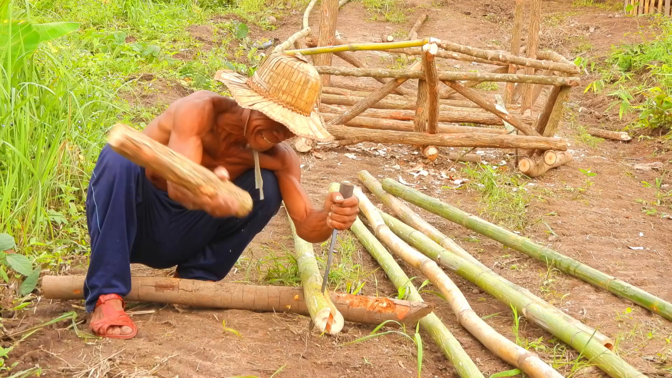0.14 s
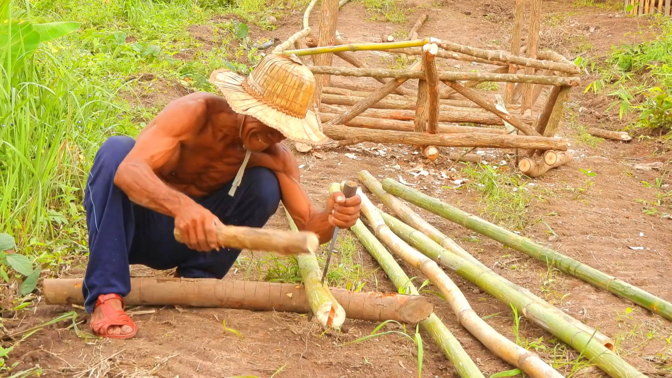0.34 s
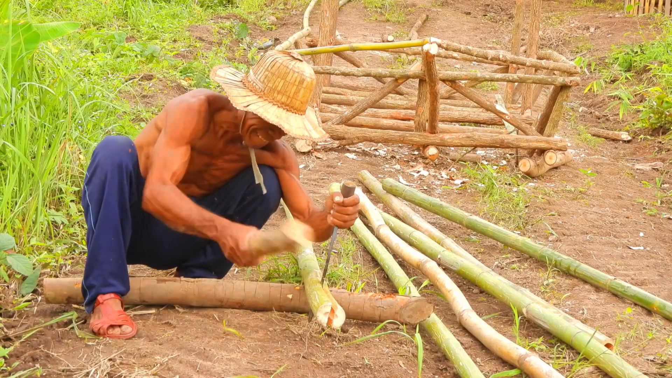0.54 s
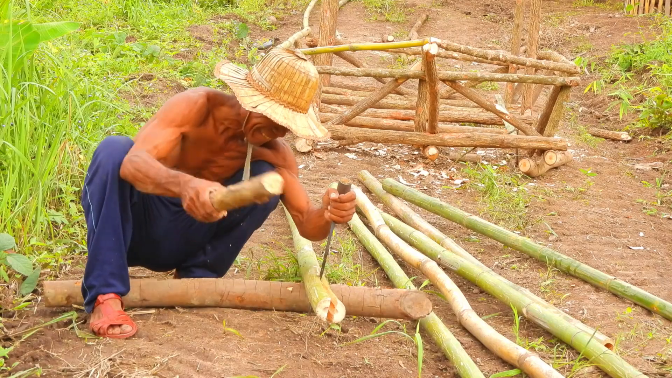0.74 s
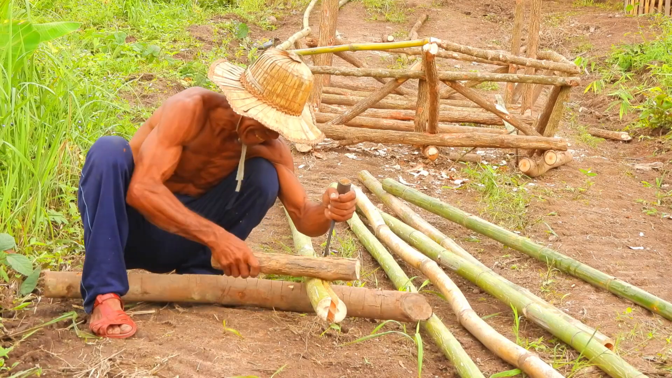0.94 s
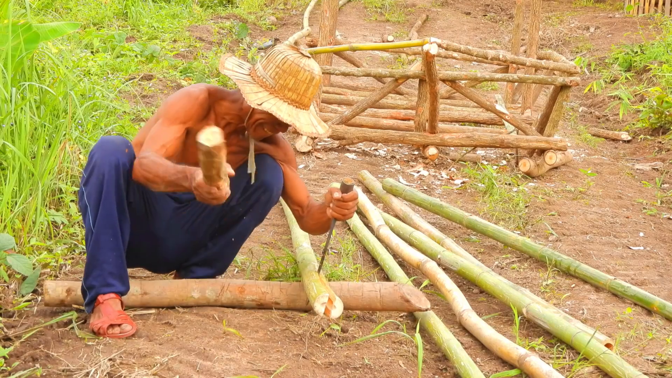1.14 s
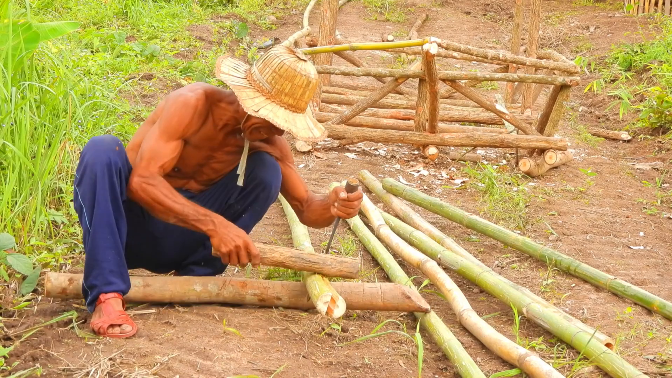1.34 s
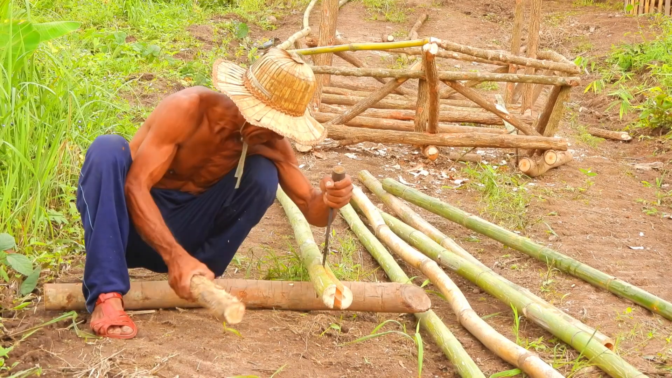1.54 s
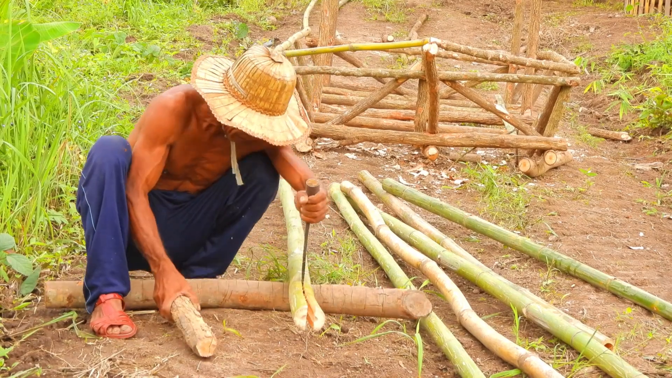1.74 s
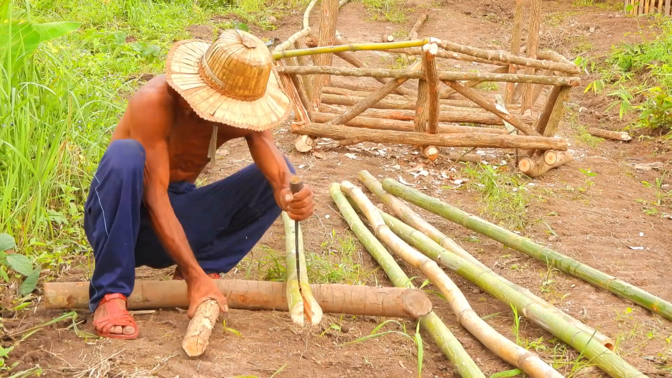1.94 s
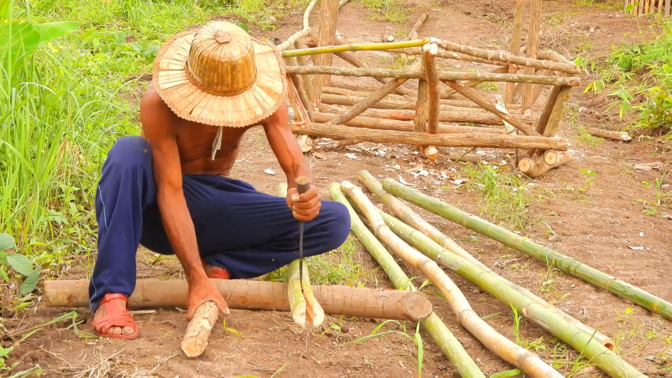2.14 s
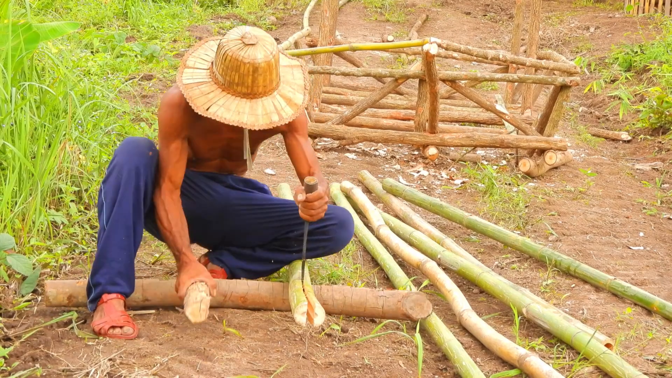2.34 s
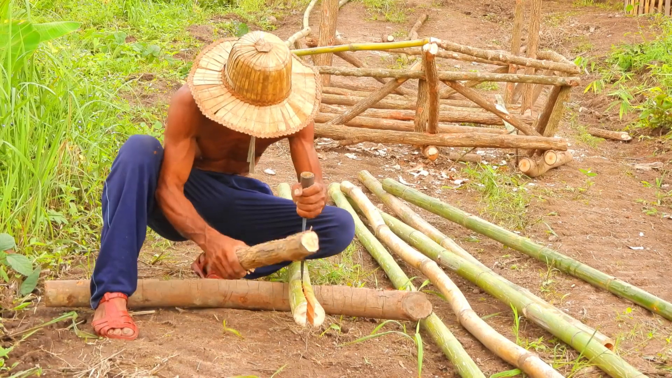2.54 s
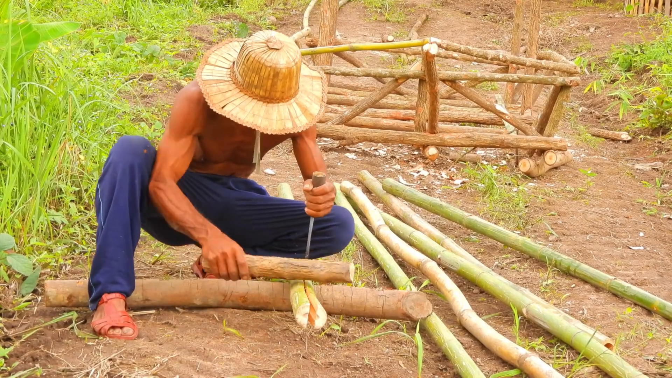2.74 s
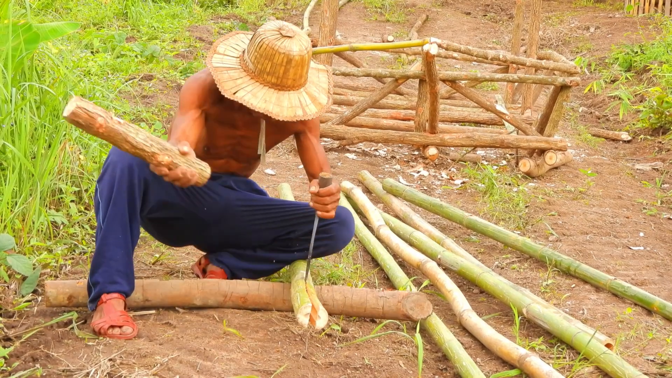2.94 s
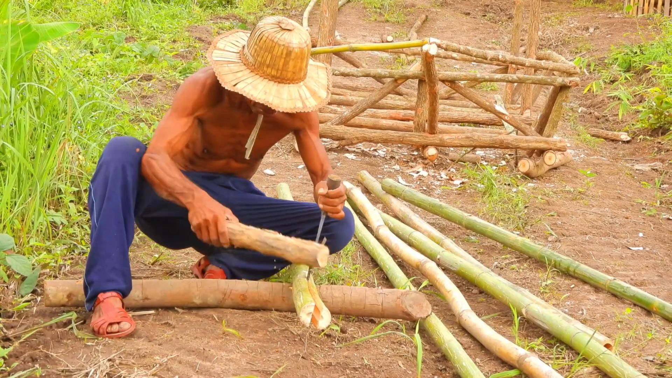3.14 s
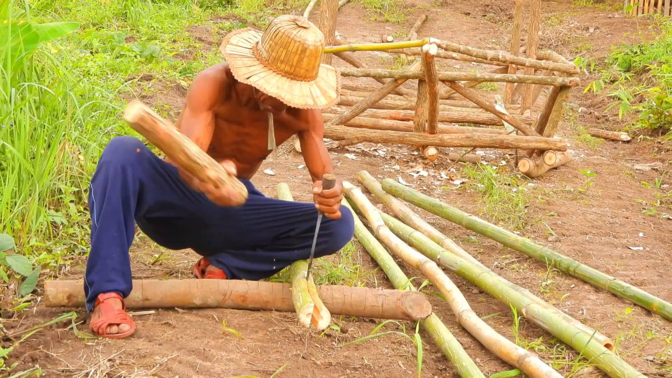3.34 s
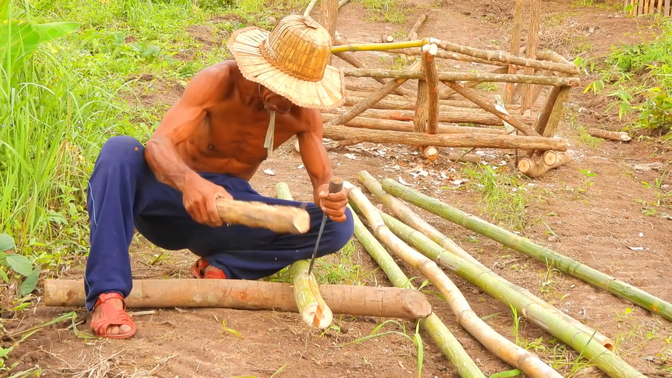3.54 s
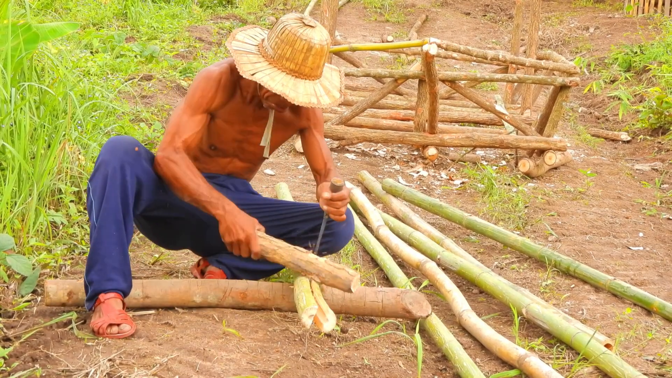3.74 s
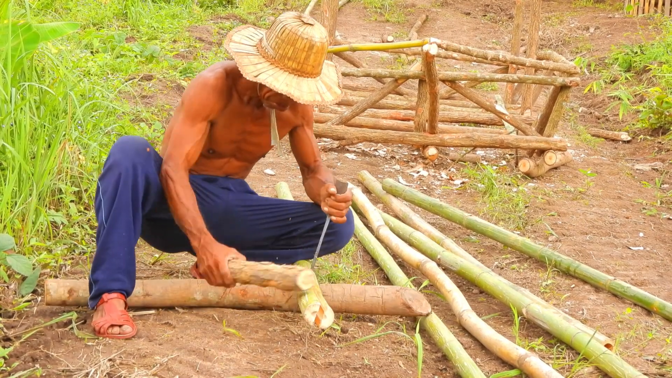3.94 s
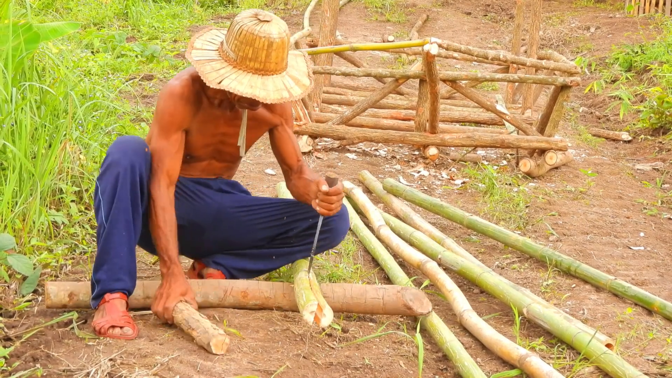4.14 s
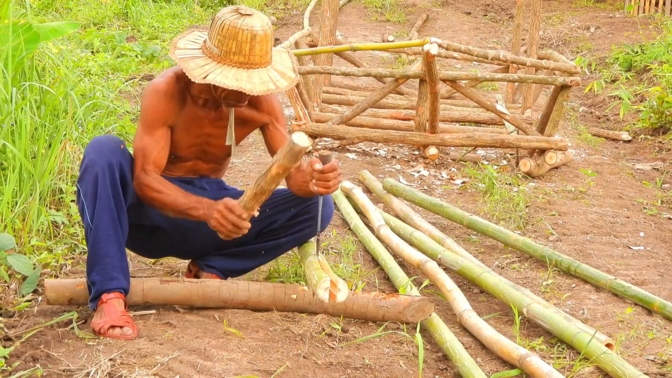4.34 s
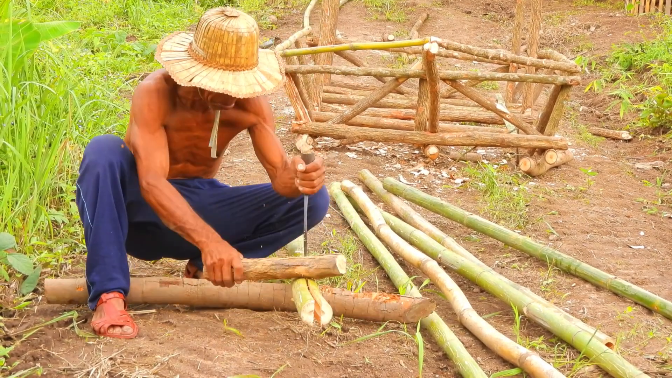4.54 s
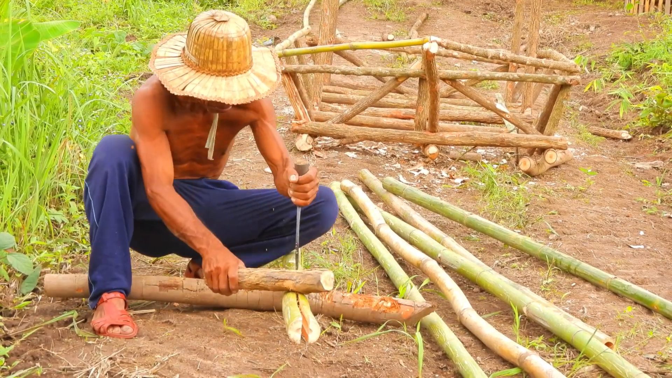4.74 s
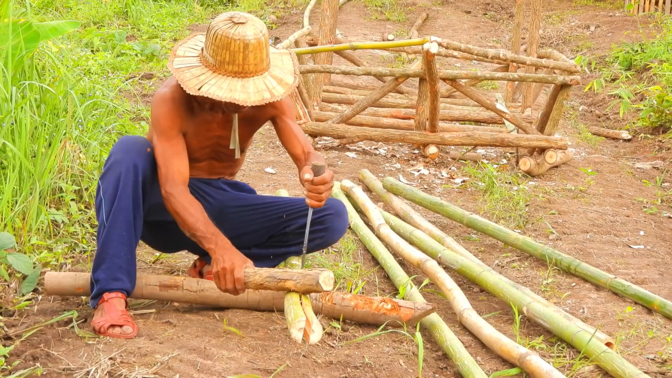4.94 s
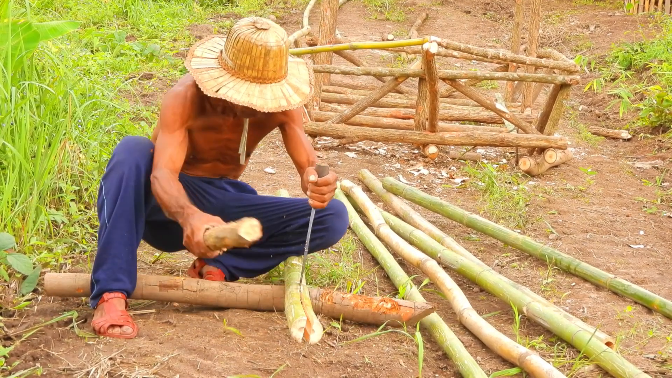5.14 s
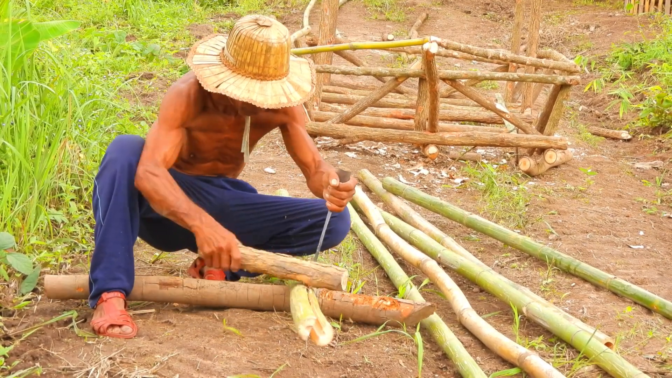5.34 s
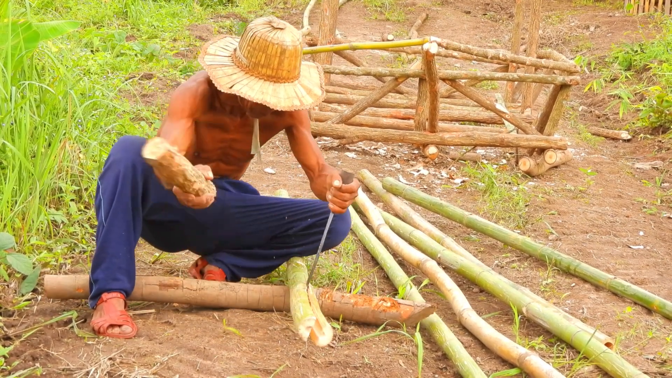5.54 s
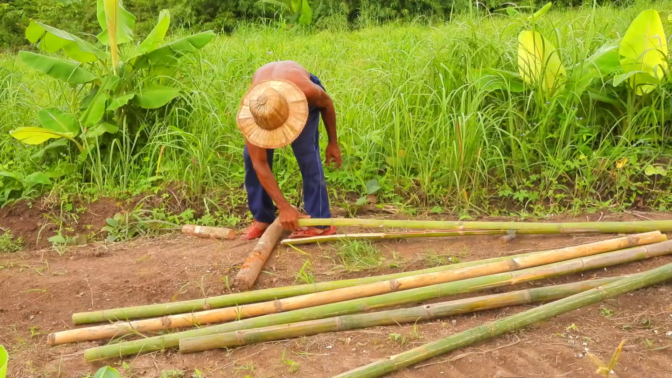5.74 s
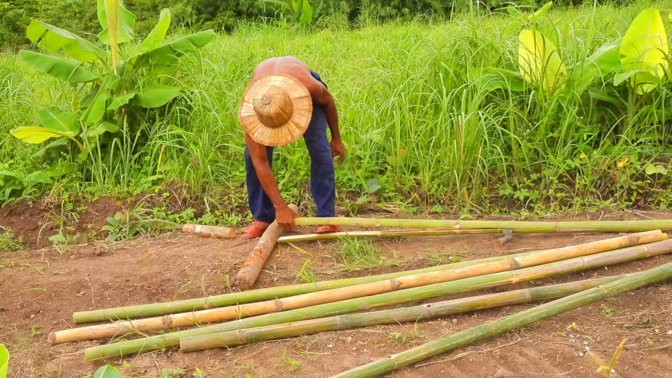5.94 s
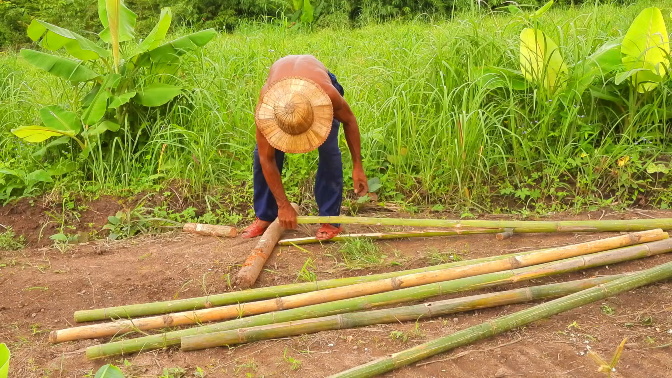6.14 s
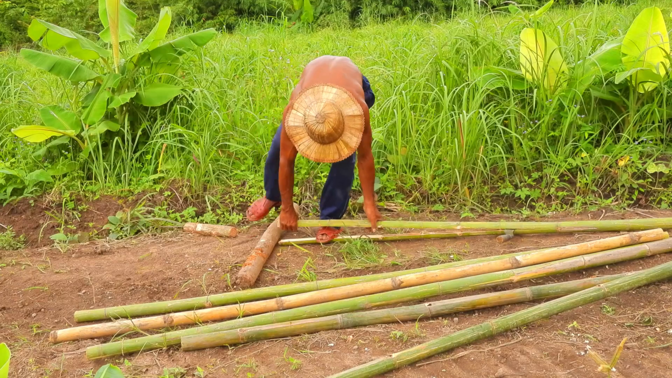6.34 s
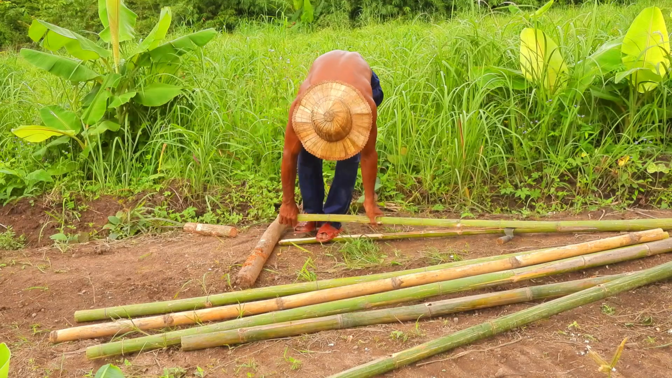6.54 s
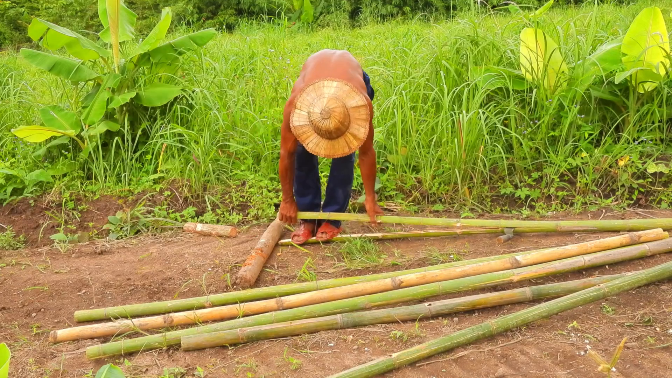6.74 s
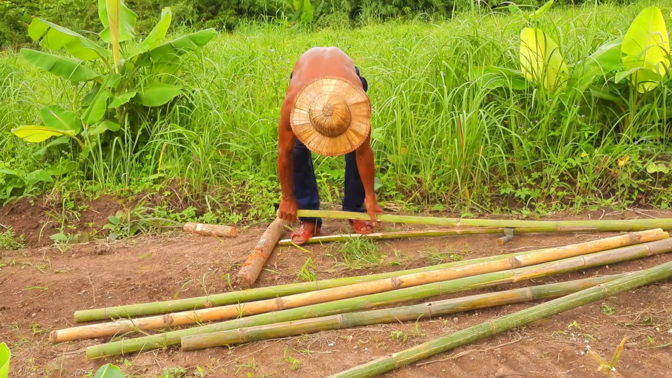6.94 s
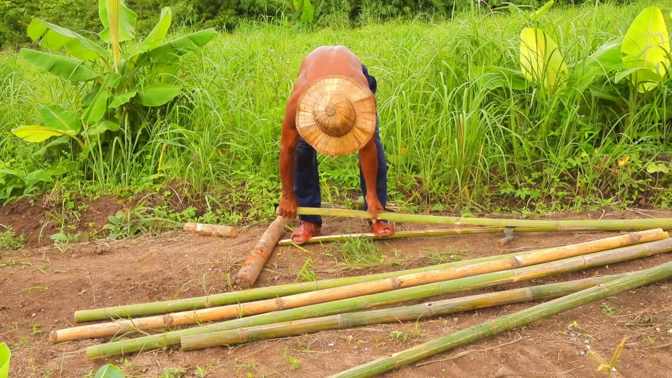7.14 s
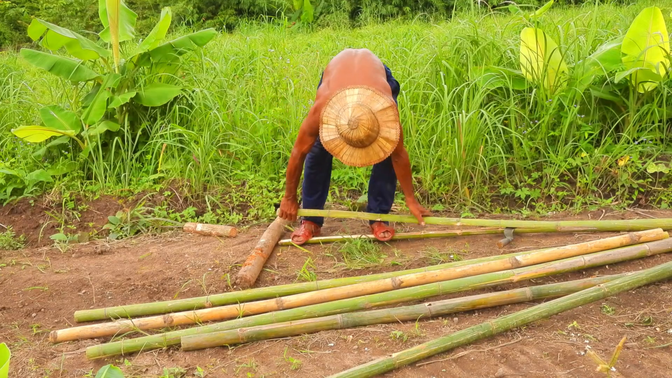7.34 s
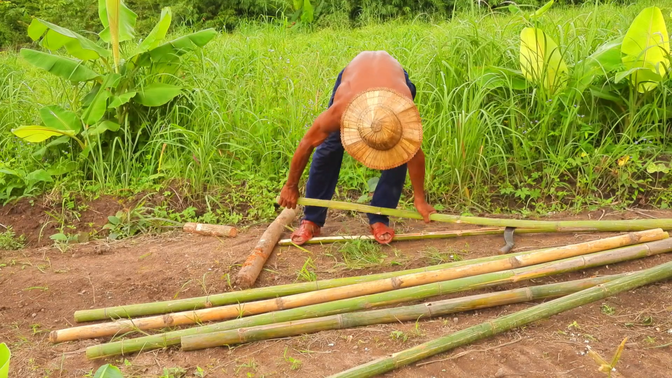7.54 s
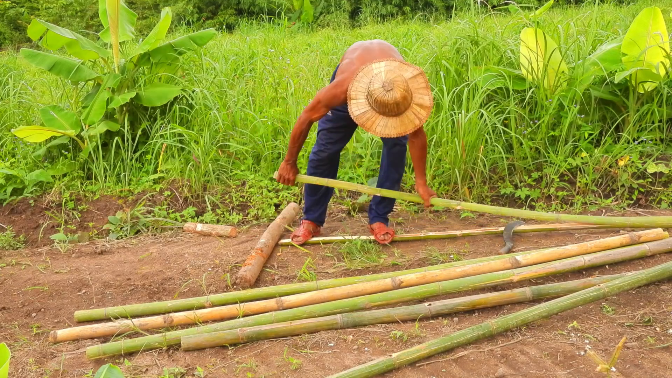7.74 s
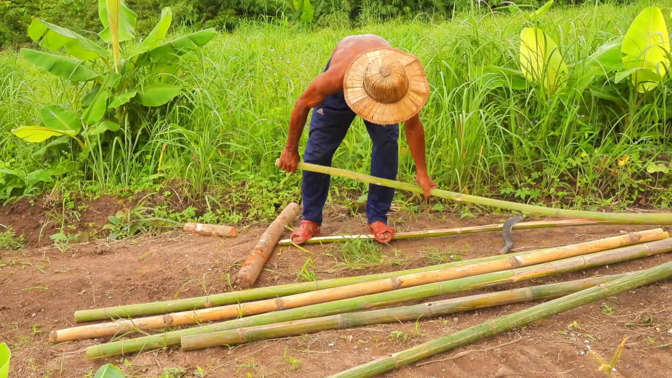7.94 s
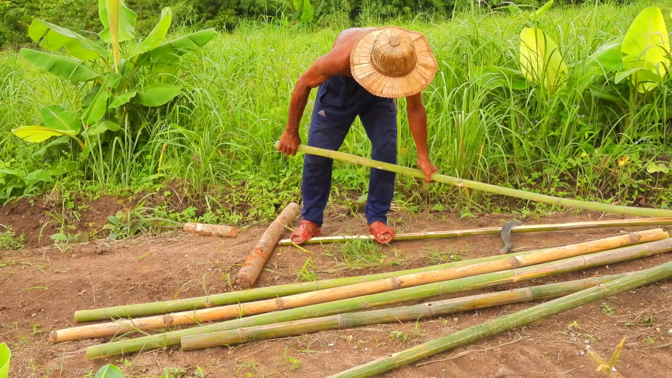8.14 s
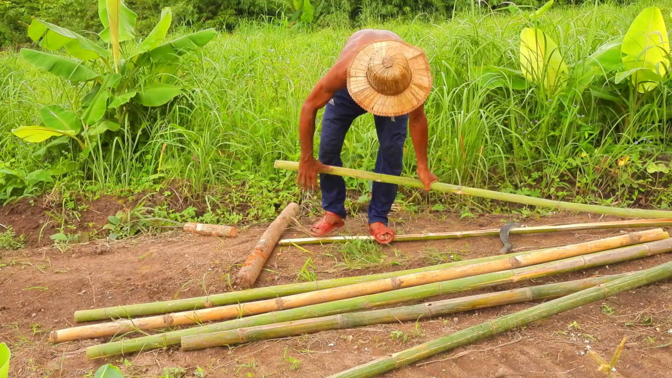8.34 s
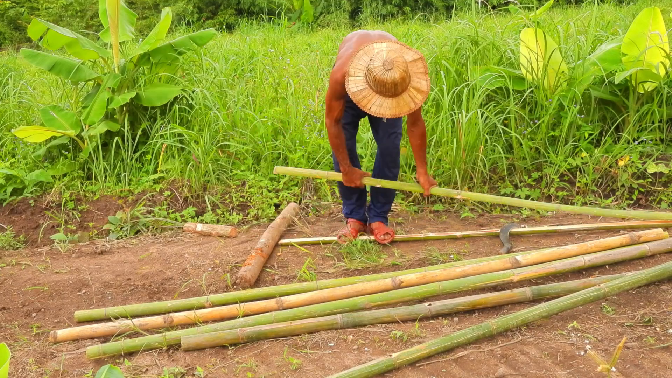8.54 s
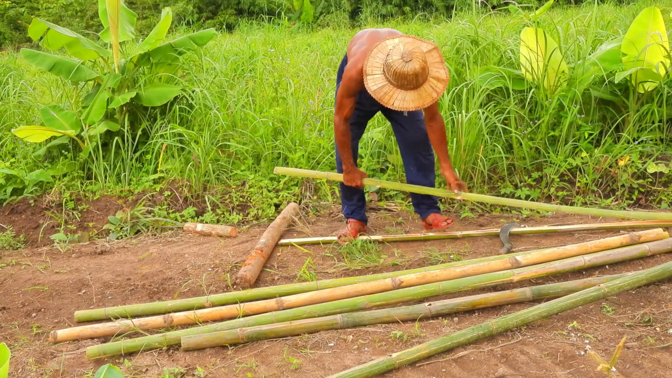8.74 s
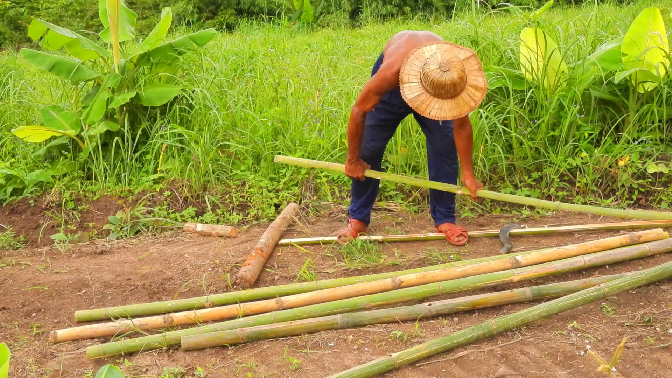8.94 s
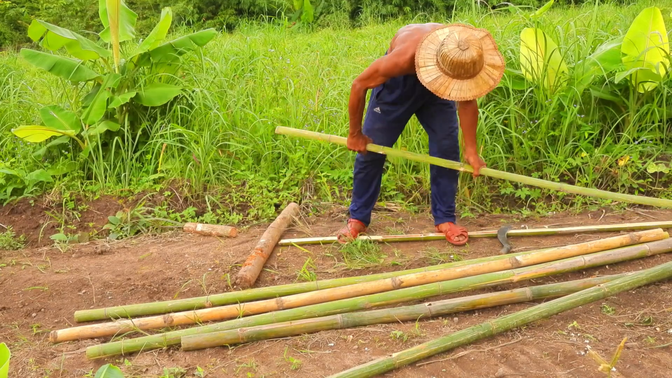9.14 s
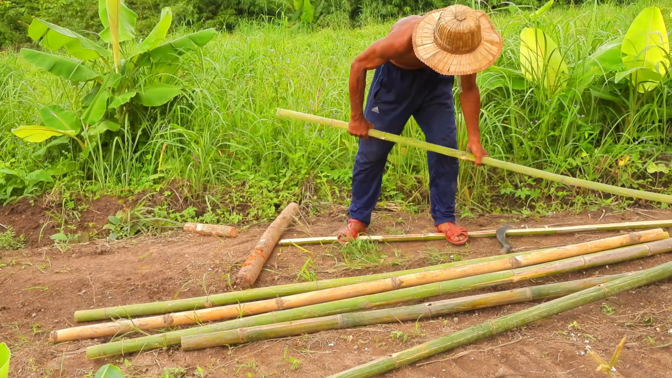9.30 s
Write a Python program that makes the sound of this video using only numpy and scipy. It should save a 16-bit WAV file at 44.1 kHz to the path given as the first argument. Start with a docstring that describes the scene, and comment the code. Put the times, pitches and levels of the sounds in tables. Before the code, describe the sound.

Hollow knocks of bamboo being split in an open field, followed by a crackling snap and two clacks, while insects drone.

```python
"""An open field: crickets drone all round the microphone, a cicada swells steadily, far birds whistle.
Close by, a wooden club drives a big knife through a bamboo pole: eight hollow, soft-edged knocks.
The background dips at each one and creeps back. After a quarter second of silence, feet scuff
dry leaves and the pole is pulled apart: it crackles, snaps, and its halves clack together twice."""
import sys
import numpy as np
from scipy import signal
from scipy.fft import rfft, irfft
from scipy.io import wavfile
from scipy.ndimage import uniform_filter1d

SR = 44100
rng = np.random.default_rng(int(sys.argv[2]) if len(sys.argv) > 2 else 0)


def pcm_store(signal):
    """Save signal as 16-bit PCM."""
    levels = np.round(np.clip(np.atleast_2d(signal), -1, 1) * 32767)
    wavfile.write(sys.argv[1], SR, levels.astype(np.int16).T)


N = 417627
T, HZ = np.arange(N) / SR, np.fft.rfftfreq(N, 1 / SR)
SHORT = np.arange(16384) / SR - .1  # seconds around the peak of one impact
SILENCE_S = (5.44, 5.68)

# Club blows on the knife; the resonances of log and tube shift as the split grows.
# time_s, force_db, thump_db, lean_db (from the top resonance to the one below), blade_db,
# mode1_hz, mode2_hz, mode3_hz, mode4_hz, stereo_likeness (0-1), dip_db (of the background)
BLOWS = [(0.387, -23, -13.5, 2.5, 1.5, 428, 699, 1264, 1634, 0.36, 9.8),
         (0.756, -25, -5, -.9, 1.2, 352, 686, 1206, 1820, 0.25, 11),
         (1.109, -27.5, -4.5, 3, 0, 250, 598, 1072, 1950, 0.11, 4.6),
         (1.472, -25, -4.5, -0.3, -5, 338, 761, 1263, 1401, .16, 5.7),
         (3.218, -26, 1, -0.8, 0, 326, 550, 925, 1810, .09, 4.8),
         (3.586, -22.5, -13, -2.5, 2.2, 291, 670, 1235, 1970, 0.12, 17),
         (3.936, -27, -12.5, 1.4, 1, 315, 788, 1164, 2090, 0.11, 10),
         (4.646, -18, -13, -1.1, 0, 253.1, 762.4, 1393, 1607, .88, 3.1)]
# The halves of the split pole clack together: columns as in BLOWS
CLACKS = [(8.117, -30, -11.5, -1.5, -1.3, 421, 930, 1454, 2010, 0.36, 19.9),
          (9.223, -30, -11.5, 1.5, 2.3, 285, 937, 992, 1350, .03, 12.2)]


def gain_of(db):
    """Decibels to amplitude."""
    return 10 ** (np.asarray(db) / 20)


def evened(x):
    """Scales to rms 1."""
    return x / np.sqrt(np.mean(x ** 2) + 1e-30)


def burst(x):
    """Scales each channel of a short sound to the energy of 20 ms at rms 1."""
    return x / np.sqrt(np.sum(x ** 2, -1, keepdims=True) / (.02 * SR) + 1e-30)


def colour(x, points):
    """Filters by a spectrum of (frequency_hz, level_db) points."""
    points_hz, db = np.transpose(points)
    hz = np.fft.rfftfreq(x.shape[-1], 1 / SR)
    return irfft(rfft(x) * gain_of(np.interp(np.log(hz + 1), np.log(points_hz), db)), x.shape[-1])


def stereo_noise(size, likeness):
    """Left and right noise, from unrelated (0) to identical (1)."""
    mid, side = rng.standard_normal((2, size))
    return np.sqrt((1 + likeness) / 2) * mid + np.sqrt((1 - likeness) / 2) * np.array([side, -side])


def wander(per_s):
    """A random drift of rms 1."""
    knots = rng.standard_normal(2048)
    return evened(np.interp(T * per_s, np.arange(len(knots)), knots))


def add(mix, start_s, sound):
    """Mixes a sound in at its start time."""
    part = mix[:, round(start_s * SR):][:, :sound.shape[-1]]
    part += sound[..., :part.shape[-1]]


def swell(rise_s, fall_s, top_s):
    """A round-topped envelope that grows and dies exponentially."""
    return np.exp(-(np.hypot(SHORT, top_s) - top_s) / np.where(SHORT < 0, rise_s, fall_s))


def crunch(envelope, likeness):
    """A dense cluster of tiny fractures, even over frequency."""
    spectrum = rfft(stereo_noise(len(envelope), likeness) * envelope)
    return burst(irfft(spectrum / (abs(spectrum) + 1e-12)) * envelope ** 0.22)


def ring(push, hz, t60_s, likeness):
    """A damped mode fed by a push; it reaches left and right out of step."""
    level = signal.lfilter([1], [1, -np.exp(-np.log(1000) / (t60_s * SR))], push)
    apart = np.arccos(likeness) / 2 * np.array([[1], [-1]]) * rng.choice([-1, 1])
    return burst(level * np.sin(2 * np.pi * (hz * SHORT + rng.random()) + apart))


def level_step(before_db, after_db):
    """A gain that steps from one level to another during the silence."""
    return gain_of(np.where(T < np.mean(SILENCE_S), before_db, after_db))


def patchy(x, depth_db):
    """Narrow patches of a steady sound come and go."""
    spectra = signal.stft(x, nperseg=2048, noverlap=1536)[2]
    patches = uniform_filter1d(rng.standard_normal(spectra.shape[1:]), size=3, axis=0)
    patches = evened(uniform_filter1d(patches, size=11, axis=1))
    spectra = spectra * gain_of(depth_db * patches)
    return evened(signal.istft(spectra, nperseg=2048, noverlap=1536)[1][:, :N])


def wash():
    """A low wash of grass and distance."""
    # The field's spectrum: frequency_hz, density_db
    spectrum = [(40, -42), (115, -33.5), (180, -15.5), (280, -6), (480, -6), (720, -3.5), (1500, -7.5),
                (2200, -6.5), (3200, -9.5), (4000, -17), (5200, -12.5), (7800, -23.5), (8800, -37.5),
                (15000, -47)]
    air = patchy(colour(stereo_noise(N, 0.09), spectrum), depth_db=4.0)
    return air * level_step(-59.5, -57.5) * gain_of(0.77 * wander(9))


def thin_tones():
    """Far bird whistles, one cricket's held note and a faint ring of bamboo, all slightly wavering."""
    # The cricket holds near 2.9 kHz from 4.22 s; the bamboo rings at 1.1 kHz around the last clack.
    # start_s, length_s, first_hz, last_hz, level_db
    tones = [(2.1, 0.28, 2396, 2150, -69.5), (2.52, 0.34, 481, 469, -72), (4.22, 1.16, 2970, 2900, -75),
             (4.5, 0.11, 2890, 2930, -76), (5.04, 0.1, 2930, 2890, -67.5), (6.72, 0.2, 2254, 2156, -68.5),
             (8.4, 0.26, 2280, 2120, -76), (8.97, 0.14, 2930, 2770, -58.5), (9.098, 0.26, 1117, 1100, -60)]
    out, waver = np.zeros((2, N)), wander(90)
    for start_s, length_s, first_hz, last_hz, db in tones:
        progress = np.linspace(0, 1, round(length_s * SR))
        glide_hz = last_hz + (first_hz - last_hz) * (1 - progress) ** 2
        hz = glide_hz * (1 + .005 * waver[:len(progress)])
        tone = np.sin(np.pi * progress) * np.sin(2 * np.pi * np.cumsum(hz) / SR)
        add(out, start_s, gain_of(db) * evened(tone))
    return out


def insect_band(hz, width_hz):
    """Many far insects near one pitch blur into a narrow band."""
    return evened(irfft(rfft(stereo_noise(N, 0.026)) * np.exp(-((HZ - hz) / width_hz) ** 2), N))


def crickets():
    """A far chorus all round the microphone, and one ticking cricket."""
    # Insect bands: pitch_hz, width_hz, before_silence_db, after_silence_db
    bands = [(2750, 17, -76.5, -112), (4890, 25, -79, -82), (4690, 220, -67, -75.5), (5760, 89, -63, -66),
             (5550, 200, -63.5, -72), (6150, 550, -64, -64.5), (7750, 360, -77, -74.5),
             (8070, 40, -72.5, -72), (10580, 600, -84, -90.5)]
    chorus = sum(level_step(*db) * gain_of(3.5 * wander(22)) * insect_band(hz, width_hz)
                 for hz, width_hz, *db in bands)
    ticks = np.sin(np.pi * np.cumsum(13 + 0.54 * wander(6.4)) / SR) ** 4
    return chorus + gain_of(-76) * ticks * insect_band(7300, 250)


def cicada():
    """The nearest cicada: sagging phrases of soft chirps, each a downward sweep, over a thin buzz."""
    first_s, every_s, half_width_s, between_db = .15, .645, 0.065, -19.5
    pitch_hz, sag_hz_per_s = 6080, 600
    chirps_per_s, fall_hz, scatter_hz, flutter_hz = 30, 520, 150, 60
    from_peak_s = ((T - first_s) / every_s + .5) % 1 * every_s - every_s / 2
    phrases = np.maximum(np.exp(-(from_peak_s / half_width_s) ** 2), gain_of(between_db))
    sweep = np.cumsum(chirps_per_s + 6 * wander(25)) / SR % 1
    note_hz = pitch_hz - sag_hz_per_s * from_peak_s + fall_hz * (.5 - sweep)
    note_hz += scatter_hz * wander(20) + flutter_hz * wander(500)
    cycles = np.cumsum(note_hz) / SR + np.array([[0], [1 / 4]])
    chirps = evened(np.sin(np.pi * sweep) ** 2 * np.sin(2 * np.pi * cycles))
    return level_step(-54, -58) * phrases * (0.99 * chirps + 0.4 * insect_band(6150, 400))


def dips():
    """How far the background is down, in dB: it sinks at each loud knock, holds and creeps back."""
    fall_s, hold_s, recover_db_per_s = .05, 0.21, 23.5
    parting = (7.76, 26.6)  # the pole parts, with the deepest dip: time_s, dip_db
    down_db = np.zeros(N)
    for time_s, *_, dip_db in BLOWS + CLACKS + [parting]:
        remaining_db = dip_db - recover_db_per_s * np.maximum(T - time_s - hold_s, 0)
        down_db = np.maximum(down_db, np.clip((T - time_s) / fall_s, 0, 1) * remaining_db)
    return down_db


def far_echo(x):
    """Distant trees return a long, dull murmur of each blow."""
    t = np.arange(SR) / SR
    tail = evened(gain_of(-60 * t / 2.5) * np.minimum(t / 0.065, 1) * stereo_noise(SR, .1))
    tail = colour(tail, [(100, -9), (300, 2), (800, 2.5), (2500, 2.5), (6000, -10.5)])
    return signal.fftconvolve(x, gain_of(-36.5) * tail / np.sqrt(SR), axes=1)[:, :N]


def near_echo(x):
    """Nearby fence and plants scatter a faint echo, then a thin tail."""
    t = np.arange(SR) / SR
    echo = evened(np.exp(-((t - .065) / .016) ** 2) * stereo_noise(SR, .2))
    tail = evened(gain_of(-60 * t / 0.64) * np.minimum(t / 0.027, 1) * stereo_noise(SR, .2))
    spectrum = [(100, -6), (300, -4.5), (800, -2.0), (2500, 8.5), (5000, 9), (12000, -7.5)]
    scatter = colour(gain_of(-34.5) * echo + gain_of(-30.5) * tail, spectrum) / np.sqrt(SR)
    return signal.fftconvolve(x, scatter, axes=1)[:, :N]


def footsteps():
    """Feet scuff dry leaves and grit, and once the knife scrapes the fibres: short puffs of tiny clicks."""
    # Scuffs (the bright one at 2.859 s is the knife scraping fibres): time_s, level_db, half_width_s, treble_db
    scuffs = [(1.886, -48, 0.01, 7), (2.859, -53, .012, 9), (5.961, -57, 0.044, -7),
              (6.413, -59.5, 0.05, -16), (6.549, -57, 0.0057, 6), (6.655, -57, 0.037, -5),
              (6.733, -51, 0.0091, -2), (6.883, -52.5, 0.012, -15), (7.286, -60, 0.018, -5),
              (8.054, -60, 0.0089, -1.5)]
    out = np.zeros((2, N))
    for time_s, db, half_width_s, treble_db in scuffs:
        grains = stereo_noise(len(SHORT), 0.27) * (rng.random(len(SHORT)) < 2500 / SR)
        spectrum = [(90, -31), (250, 6.5), (1500, 3), (4000, 2.0),
                    (7000, treble_db), (15000, treble_db - 17.5)]
        leaves = evened(colour(grains, spectrum)) * np.exp(-(SHORT / half_width_s) ** 2 / 2)
        add(out, time_s + SHORT[0], gain_of(db) * leaves)
    return out


def bumps():
    """A soft push rings two damped modes, with a dull thud and a scuff of grit."""
    # Light bumps of club, feet and pole: time_s, level_db, pitch_hz, t60_s, scuff_db (relative)
    contacts = [(0.477, -66, 201, 0.075, -20.5), (1.888, -45.5, 220, 0.14, -3), (1.95, -58, 199, 0.09, -4),
                (2.866, -57.5, 280, 0.21, 5), (4.106, -62.5, 720, 0.11, 0.5),
                (4.256, -58, 225, 0.053, -4.5), (5.288, -45.5, 630, 0.01, -8),
                (5.369, -50, 582, 0.039, -12), (5.785, -51, 590, 0.054, -19), (6.113, -53, 648, 0.036, -21),
                (8.935, -47, 954.6, 0.093, -9), (8.955, -54, 954, 0.034, -1.5),
                (9.273, -44, 980, 0.031, -9)]
    grit_spectrum = [(100, -35), (450, 0), (1200, -1), (3000, -8), (6000, -22), (14000, -42)]
    out = np.zeros((2, N))
    for time_s, db, hz, t60_s, scuff_db in contacts:
        softness = (600 / hz) ** 0.35  # heavy, low things settle slowly; the light cane taps quickly
        touch = swell(rise_s=.0018 * softness, fall_s=.0036 * softness, top_s=.004 * softness)
        thud_spectrum = [(hz / 3, -38), (hz * 0.91, -2), (hz * 1.2, -2), (hz * 3, -22), (16000, -80)]
        thud = burst(colour(crunch(touch, 0.88), thud_spectrum))
        slide = swell(rise_s=.003 * softness, fall_s=.004 * softness, top_s=.009 * softness)
        grit = burst(colour(crunch(slide, .3), grit_spectrum))
        fundamental = 0.88 / softness ** .5 * ring(touch, hz, t60_s, .8)
        overtone = gain_of(-15.5) * softness ** 2 * ring(touch, 3.03 * hz, t60_s, 0.37)
        bump = fundamental + overtone + 0.97 * thud + gain_of(scuff_db) * grit
        add(out, time_s + SHORT[0], gain_of(db) * bump)
    return out


def freed_cane():
    """The freed half of the cane rings on after the parting and after each clack."""
    # Its modes: pitch_hz, level_db, t60_s
    modes = [(1130, -49, 0.33), (1270, -39, 0.087), (2112, -34.5, 0.11), (2730, -53.5, 0.5),
             (3050, -39.5, 0.13), (3960, -56, 0.21), (4330, -59, 0.19)]
    # Jolts that ring it: start_s, force_db
    jolts = [(7.767, -6.5), (8.12, -7), (9.227, 4.5)]
    out, t = np.zeros((2, N)), np.arange(SR // 2) / SR
    for start_s, force_db in jolts:
        for hz, db, t60_s in modes:
            tone = np.sin(2 * np.pi * (hz * t + rng.random((2, 1))))
            add(out, start_s, gain_of(force_db + db - 60 * t / t60_s) * tone)
    return out


def splitting():
    """Fibre bundles snap ever harder; between them fine fibres tear, until the pole parts."""
    # Bundles breaking: time_s, force_db, body_db (relative to the snap)
    snaps = [(7.54, -43.5, -3), (7.586, -48.5, -1), (7.651, -38.5, -11), (7.690, -39, -12.5),
             (7.718, -22.5, -44), (7.731, -27, -28), (7.7648, -23, 6.5), (7.809, -49.5, 2.5)]
    # Spectra of a snap, the hollow tube and tearing fibres: frequency_hz, density_db
    snap_spectrum = [(180, -47), (300, -28.5), (641, -25.5), (877, -12.5), (1350, -29.5), (1510, 0),
                     (1780, -14.5), (2000, 1.5), (2740, -8), (9450, -19), (15500, -46)]
    tube_spectrum = [(30, -7), (90, -9), (200, 3.5), (400, 3.5), (900, 14), (1600, 13.5), (2600, -23),
                     (6000, -32)]
    fibre_spectrum = [(180, -53), (300, -68), (476, -52), (808, 3), (1510, -4), (2210, 4.5), (3340, -13),
                      (5570, -9), (7020, -18), (15500, -25.5)]
    # Course of the tearing: time_s, level_db
    tear = [(7.6, -59), (7.68, -57), (7.712, -39), (7.74, -45), (7.748, -36.5), (7.762, -27), (7.77, -48.5),
            (7.782, -73), (7.82, -83)]
    out, snap = np.zeros((2, N)), swell(rise_s=0.00086, fall_s=0.0043, top_s=0.00017)
    for time_s, force_db, body_db in snaps:
        crack = burst(colour(crunch(snap, 0.78), snap_spectrum))
        body = gain_of(body_db) * burst(colour(crunch(snap, 0.91), tube_spectrum))
        add(out, time_s + SHORT[0], gain_of(force_db - 8.5) * (crack + body))
    fibres = stereo_noise(N, 0.57) * (rng.random(N) < 5000 / SR)
    tear_db = np.interp(T, *np.transpose(tear), left=-200, right=-200)
    out += evened(colour(fibres, fibre_spectrum)) * gain_of(tear_db)
    return out * gain_of([[-1], [1]])  # a little right of the microphone


def wood_crunch(band_db, likeness):
    """Struck fibres crunch, coloured by the wood around them."""
    # Six bands of a knock, from the thump up: edge_hz
    edges_hz = [180, 450, 900, 1400, 2400, 4500, 9000]
    centres_hz = np.sqrt(np.multiply(edges_hz[1:], edges_hz[:-1]))
    density_db = band_db - 10 * np.log10(np.diff(edges_hz) / (SR / 2)) + [-4, -3, -4.5, -4, -2, -1.5]
    bass = [(30, density_db[0] - 33.5), (120, density_db[0] - 25), (215, density_db[0] - 2.5)]
    blow = swell(rise_s=0.0021, fall_s=0.0026, top_s=0.032)
    contact = crunch(blow, likeness)
    # the wood bounces at once: the second contact combs the spectrum
    bounce = 0.44 * np.roll(contact, round(rng.uniform(.007, .011) * SR))
    fibres = burst((contact + bounce) * blow ** 0.12)
    sound = colour(fibres, bass + list(zip(centres_hz, density_db)) + [(15000, density_db[-1] - 19)])
    # crowded, well-damped wood modes make the spectrum uneven
    low_modes = [(180, 0.5), (255, 2), (335, 4), (415, -6.0), (540, 0), (800, 3.5)]
    wood_hz = np.geomspace(900, 9000, num=64)
    wood_db = 2.4 * (-1) ** np.arange(len(wood_hz)) * rng.uniform(.3, 1.7, len(wood_hz)) - .5
    return colour(sound, low_modes + list(zip(wood_hz, wood_db)))


def knock(row, upper_bands_db, pan_db):
    """A blow crunches the fibres and sets log, tube and blade ringing."""
    # High modes of cane and wedged blade: pitch_hz, level_db (relative to the 2400-4500 Hz band), t60_s
    blade_modes = [(1457, -6.5, 0.024), (1987, -7.5, 0.053), (2276, -8.5, 0.05), (2290, -14.5, 0.073),
                   (2579, -14, 0.084), (2980, -12, .04), (3170, -12.5, .045), (3526, -14, 0.07),
                   (3660, -11.5, 0.035), (4380, -20.5, 0.068), (4930, -18.5, .04)]
    _, force_db, thump_db, lean_db, blade_db, *modes_hz, likeness, dip_db = row
    top_lag_db = .45 * (-26 - force_db)  # the top band grows less than the rest with force
    band_db = force_db + np.r_[thump_db, upper_bands_db]
    band_db += [0, 0, lean_db, -lean_db, blade_db, top_lag_db]
    sound = wood_crunch(band_db, likeness)
    ring_s = .15 * gain_of(-0.61 * dip_db)  # a deep dip cuts the ring short
    push = np.roll(swell(rise_s=0.00091, fall_s=0.001, top_s=0.02), -round(0.0078 * SR))
    for hz, db, ring_db in zip(modes_hz, band_db, [-2.0, -2.5, -6.5, -8.0]):
        # the stronger a mode is driven, the longer it is heard
        t60_s = ring_s * gain_of(0.2 * (db - band_db.max())) * (430 / hz) ** 0.38
        sound += gain_of(db + ring_db) * ring(push, hz, t60_s, likeness)
    # the cleft grips the blade differently each time, which shifts and mutes its modes
    grips = rng.uniform(-1, 1, (len(blade_modes), 2))
    for (hz, db, t60_s), (shift, grip) in zip(blade_modes, grips):
        mode = ring(push, hz * (1 + 0.045 * shift), t60_s, likeness)
        sound += gain_of(band_db[-2] + db + 2.2 * grip) * mode
    return sound * gain_of(np.array([[.5], [-.5]]) * pan_db)


def knocks():
    """Close in front of the microphone: the club blows, then the clacks of the split pole."""
    out = np.zeros((2, N))
    for row in BLOWS:
        add(out, row[0] + SHORT[0], knock(row, upper_bands_db=[4, 4, 2.3, -6.5, -11.5], pan_db=0.07))
    for row in CLACKS:
        add(out, row[0] + SHORT[0], knock(row, upper_bands_db=[-2, 2.2, 8, -4.5, -9], pan_db=-1.5))
    return out


def scene():
    """The close work and its echoes over the field; chorus and cicada dip fully, wash and echoes less."""
    work = knocks() + bumps() + splitting() + footsteps() + freed_cane()
    down_db = dips()
    distance = (wash() + far_echo(work)) * gain_of(-0.8 * down_db)
    echo = near_echo(work) * gain_of(-.25 * down_db)
    return work + echo + thin_tones() + distance + (crickets() + cicada()) * gain_of(-down_db)


def record(dry):
    """The sound drops out for a quarter of a second; the highest treble is cut throughout."""
    gate = uniform_filter1d(1. * ((T < SILENCE_S[0]) | (T > SILENCE_S[1])), size=300)
    lowpass = signal.firwin(511, cutoff=15900, window=("kaiser", 9), fs=SR)
    return signal.oaconvolve(dry * gate, lowpass[None], "same")


dry = scene()
out = record(dry)
pcm_store(out)
```